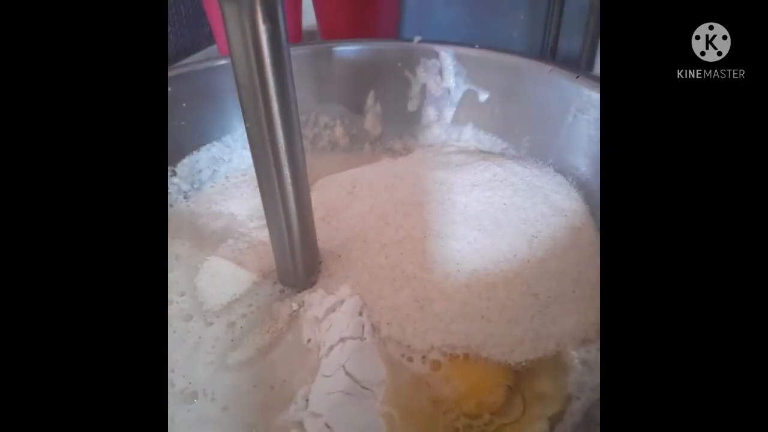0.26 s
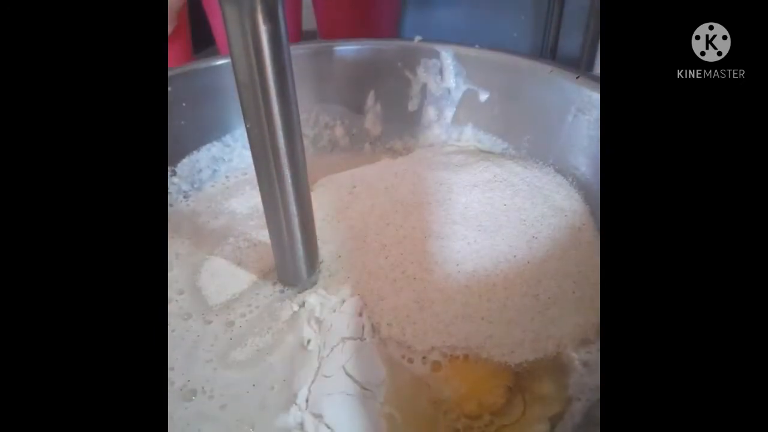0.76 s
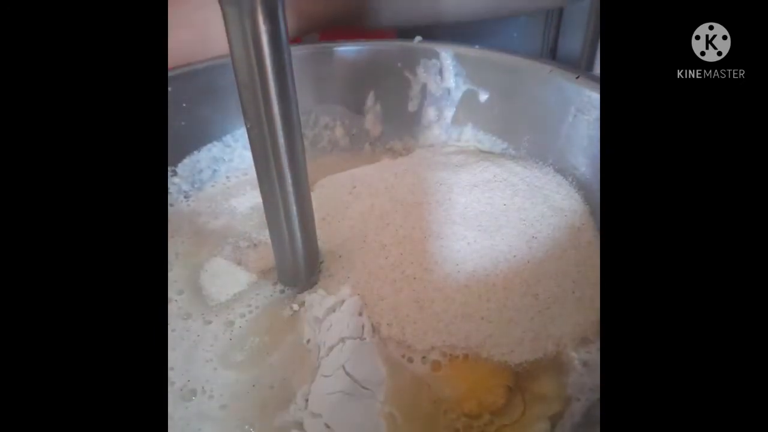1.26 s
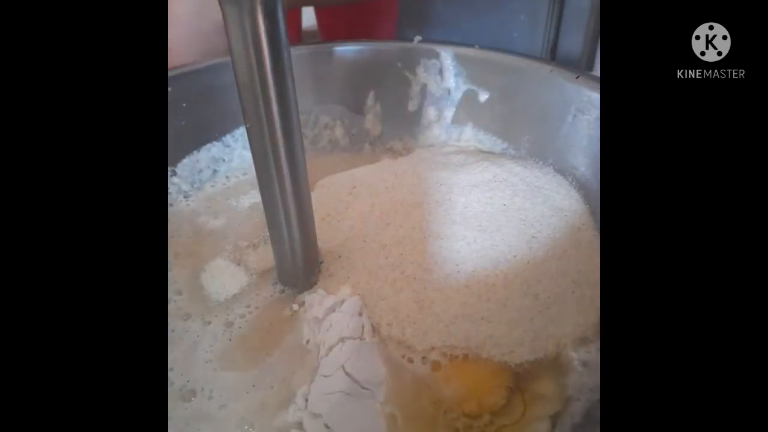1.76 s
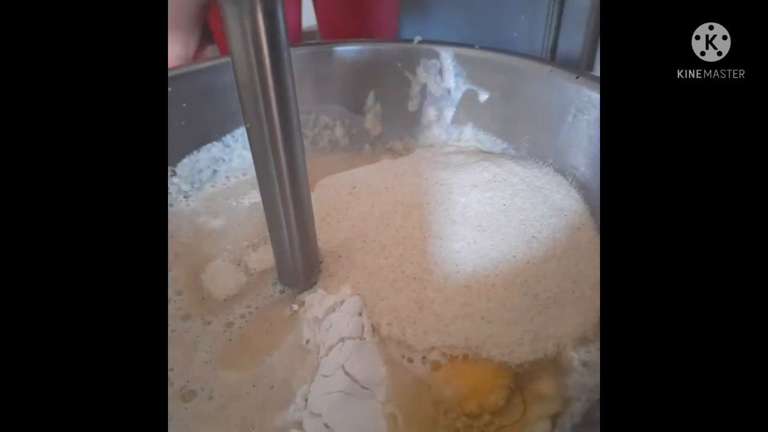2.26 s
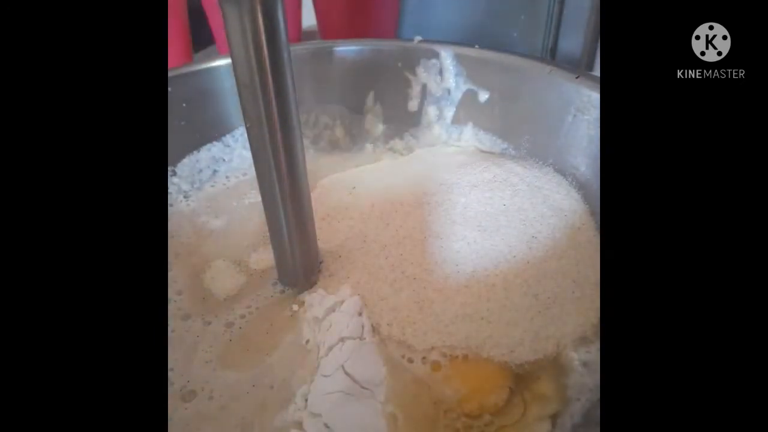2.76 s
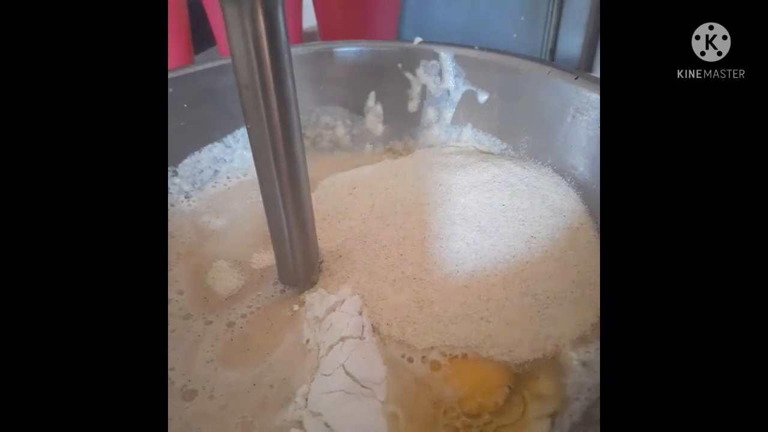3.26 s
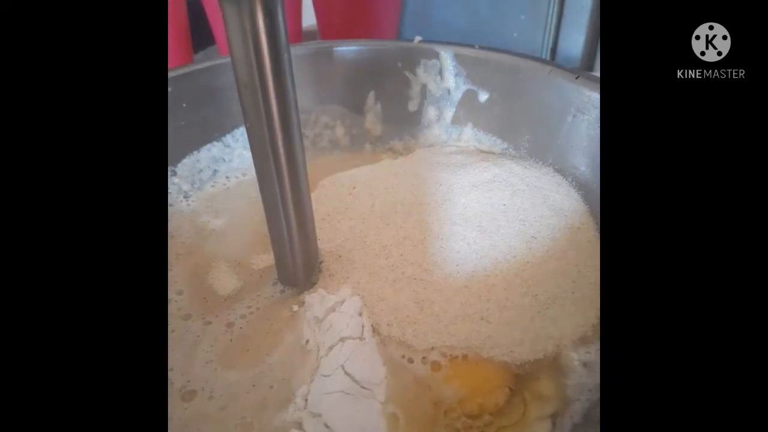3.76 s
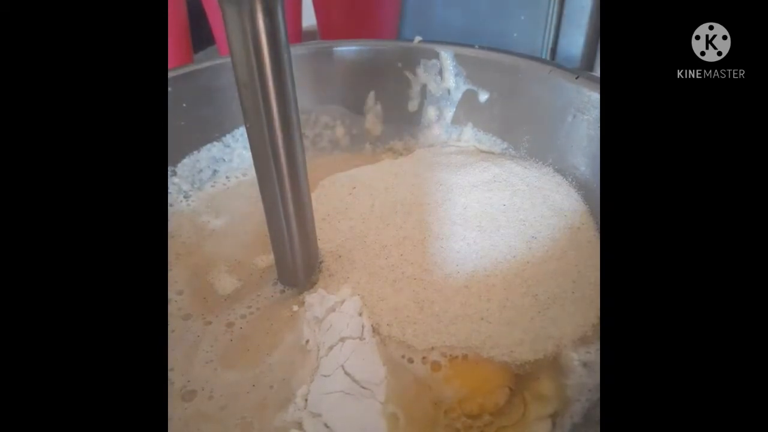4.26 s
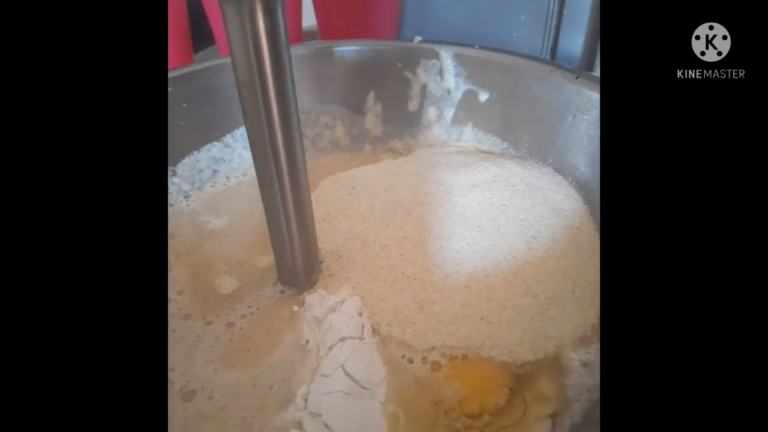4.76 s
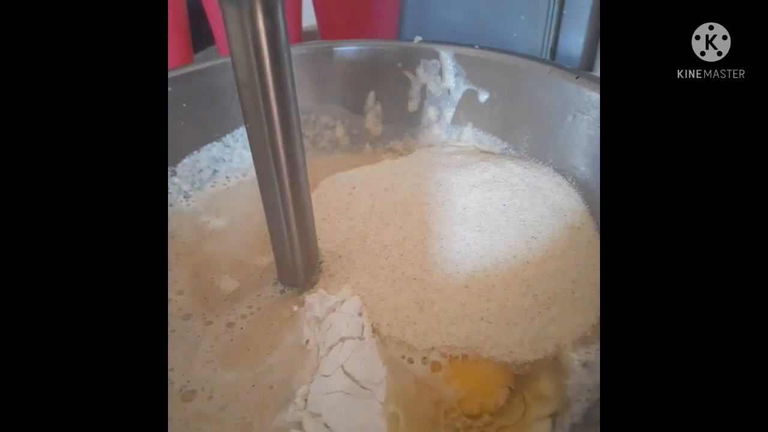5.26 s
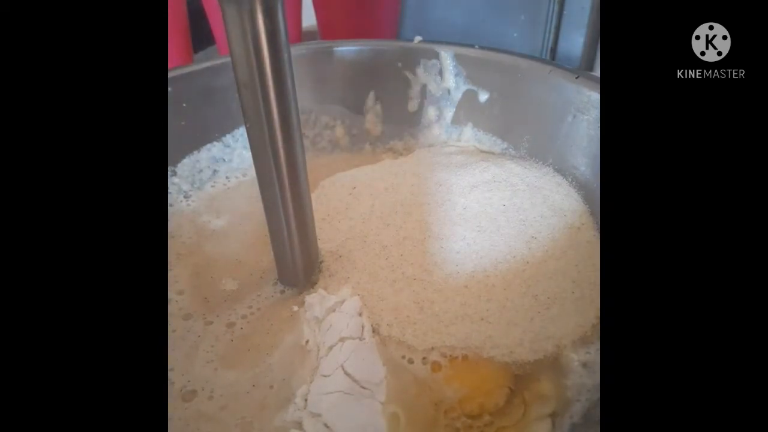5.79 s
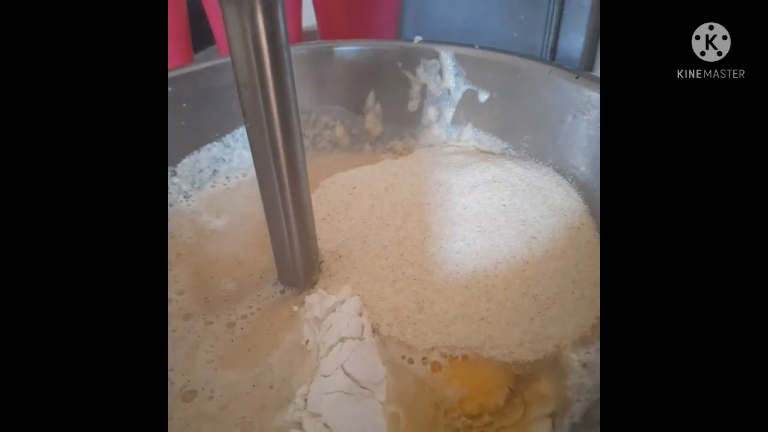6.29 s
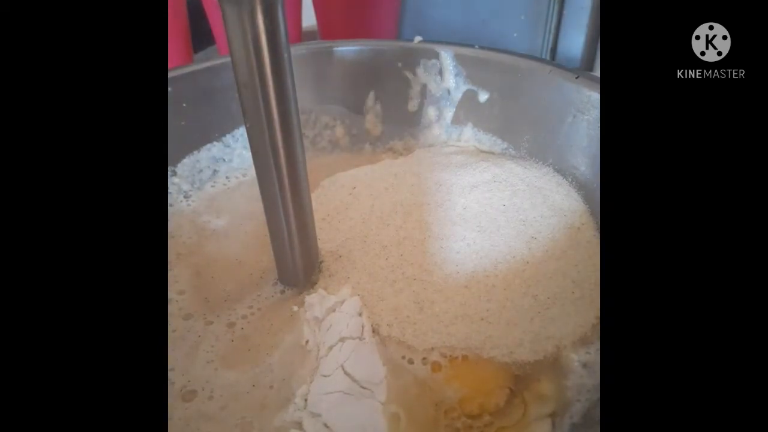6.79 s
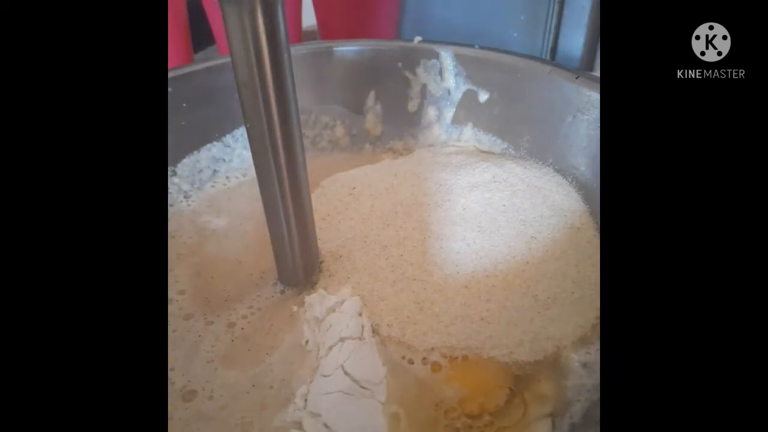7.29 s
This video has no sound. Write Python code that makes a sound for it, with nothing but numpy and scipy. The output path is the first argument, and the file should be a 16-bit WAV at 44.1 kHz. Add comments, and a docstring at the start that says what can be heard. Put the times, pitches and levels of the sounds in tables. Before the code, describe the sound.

In a hushed kitchen, a hollow knock and small counter taps lead into thin paper rustling, then two sharp bursts of tearing and fading crinkles.

```python
"""In a small kitchen, paper sachets are crinkled and torn open twice, over quiet air and a faint hum.
The paper is made of many tiny cracks, larger snaps, dull pops and low puffs, all shaped bursts.
Early on, a blow rings something hollow, and taps and a shove ring a container on the counter.
Echoes and a dying tail of noise make the room. The right microphone port has a strong cavity
resonance that honks on every sound."""
import sys
import numpy as np
from scipy import signal
from scipy.fft import rfft, irfft
from scipy.io import wavfile
from scipy.ndimage import uniform_filter1d

SR = 44100
rng = np.random.default_rng(int(sys.argv[2]) if len(sys.argv) > 2 else 0)


def generate_wav(sig):
    """Save sig (samples, or channels by samples) to the path in sys.argv[1] as 16-bit PCM at SR."""
    pcm = np.round(np.clip(np.atleast_2d(sig).T, -1, 1) * 32767).astype(np.int16)
    wavfile.write(sys.argv[1], SR, pcm)


N = 332411
T = np.arange(N) / SR  # the time of every sample, in seconds

# fingers squeezing and shifting the sachet: (firm at [s], held for [s], relative level [dB],
# body against that level [dB], fizz against that level [dB]); body and fizz get a shared offset later
SQUEEZES = [(0.002, 0.0083, -62.5, 8, 0), (1.295, .02, -65.5, 6, -10), (1.345, 0.071, -61.5, -5, -8),
            (1.52, 0.049, -59, 6.5, -9.5), (1.97, 0.083, -52, -4.5, -9), (2.164, 0.031, -57.5, -2, 0),
            (2.24, 0.038, -49, -3, -5.5), (2.32, 0.064, -60.5, 2, -3), (2.87, 0.06, -71, 0, -3),
            (2.933, 0.16, -60.5, 4.5, -11.5), (3.085, 0.048, -49.5, 1, -6), (3.211, 0.22, -51, -0.5, -10),
            (3.445, 0.062, -52, -4.5, -3), (3.549, 0.034, -50.5, -2.5, -8), (3.711, 0.12, -47, -2.5, -7.5),
            (3.842, 0.24, -56, 0, -6), (4.099, 0.059, -48, -1, -9), (4.214, 0.068, -47, -4, -2.5),
            (5.032, 0.11, -41.5, -1.5, -6.5), (5.2, 0.097, -62.5, -17, -4), (5.38, 0.16, -67.5, 1.5, -10),
            (5.578, .035, -46.5, -14, -9), (5.62, .14, -46, -1.5, -4), (6.3, 0.11, -45, -6, -4),
            (6.443, 0.022, -49.5, 5.5, -12), (6.595, 0.057, -43.5, -3.5, -7.5), (6.67, 0.16, -51, 6, -7),
            (6.861, 0.15, -48, -2, -10.5), (6.958, 0.044, -45.5, -6, -7), (7.049, 0.091, -54, -4, -9),
            (7.163, 0.067, -53, -0.5, -7.5), (7.36, .07, -60.5, -10, -7.5)]
SQUEEZE_RISE_DB_PER_S, SQUEEZE_SAG_DB_PER_S, SQUEEZE_RELEASE_DB_PER_S = 1000, 28.5, 221
# pulls that rip the paper, two for the first tear and three for the second: (ripping at [s],
# held for [s], relative level [dB], body against that level [dB], fizz against that level [dB])
TEARS = [(4.4, 0.19, -29.5, -5, -5.5), (4.69, 0.2, -37, -2.5, -7.5), (5.867, 0.08, -22, -6, -4),
         (6.042, 0.125, -34, -2, -6), (6.183, 0.072, -32.5, -2.5, -7)]
TEAR_RISE_DB_PER_S, TEAR_SAG_DB_PER_S, TEAR_RELEASE_DB_PER_S = 520, 13.5, 254
# large creases snapping: (time [s], relative level [dB], relative fizz [dB])
SNAPS = [(1.341, -34, -13.5), (1.509, -41.5, -11), (1.95, -36.5, -10), (1.996, -33, -16), (2.0737, -45, -7),
         (2.2023, -36, -8), (2.2399, -30, -12), (2.2897, -40, -20), (2.32, -30.5, -9.5), (3.1144, -38, -12),
         (3.1428, -32.5, -24), (3.2081, -38, -4.5), (3.3977, -37.5, -30), (3.4212, -30.5, -12),
         (3.5427, -27, -9), (3.5874, -43.5, 5.5), (3.672, -26.5, -9.5), (3.738, -30, -15),
         (3.7913, -30, -12), (4.0872, -30.5, -13.5), (4.14, -28, -10.5), (4.2138, -23.5, -9),
         (4.2303, -24, -24), (4.3656, -34, -26), (4.384, -22, -13), (4.4298, -9.5, -16.5),
         (4.5076, -7, -6.5), (4.5746, -12.5, -17.5), (4.6613, -22.5, -1.5), (4.679, -12, -13.5),
         (4.723, -18.5, -29), (4.7724, -15, -9.5), (4.8125, -20.5, -5.5), (4.8709, -14.5, -13),
         (4.9774, -27.5, -13), (4.9851, -27, -21.5), (5.0146, -27.5, -6.5), (5.0335, -14.5, -20),
         (5.0724, -21, -12.5), (5.1013, -19, -16.5), (5.1353, -20.5, -10), (5.1971, -32, -8.5),
         (5.482, -46.5, -3), (5.5538, -28.5, -10.5), (5.6167, -29.5, -24), (5.7115, -23.5, -13),
         (5.8336, -20, -16), (5.8846, -18.5, -12), (5.9155, -8.5, -16), (6.0632, -21.5, -7),
         (6.1739, -14, -14), (6.1893, -14.5, -5.5), (6.213, -12, -7), (6.2589, -11.5, -9.5),
         (6.325, -25.5, -12), (6.4453, -26, -7.5), (6.575, -22, -12.5), (6.6023, -21.5, -20),
         (6.6343, -26.5, -15), (6.7262, -31, -15), (6.789, -33.5, -10), (6.8808, -36, -35),
         (6.9873, -19.5, -8.5), (7.0509, -32, -11), (7.1587, -28.5, -16.5), (7.223, -33.5, -18),
         (7.351, -37, -24), (7.418, -40.5, -31)]
# the sachet's wall buckling with a dull pop: (time [s], level [dB], pitch [Hz])
POPS = [(0.0, -52, 870), (0.026, -52.5, 800), (0.468, -60.5, 774), (2.209, -52.5, 570), (2.532, -55.5, 910),
        (3.328, -40, 496), (4.5948, -17.5, 674), (4.7245, -34, 700), (5.033, -31, 1000), (6.0645, -31, 800),
        (6.4415, -32, 586), (6.798, -48, 497)]
# tugs that flap the whole sachet: (time [s], level [dB])
FLAPS = [(2.922, -59), (3.329, -58), (3.39, -60), (4.43, -37.5), (4.5, -31), (4.568, -36), (4.672, -35.5),
         (4.78, -38.5), (5.027, -51), (5.918, -29.5), (6.249, -35.5)]
# tone colour of the paper: (frequency [Hz], relative level [dB])
PAPER = [(25, -14), (55, -25.5), (110, -6), (170, -14), (300, -3), (420, -2.5), (700, -0.5), (1400, 2.5),
         (1900, 5.5), (2700, 0.5), (4200, 2), (8000, -11), (11500, -10), (15500, -11.5)]
# the hollow knock: (time [s], level [dB])
KNOCK = (0.7648, -20.5)
# ringing tones of the hollow body: (frequency [Hz], relative level [dB], time to fall by 60 dB [s])
HOLLOW = [(310, -14, 0.076), (389, -8.5, 0.082), (650, -12.5, 0.11), (860, -14.5, 0.24), (800, 2, 0.036),
          (936, -2.5, 0.056), (1260, -3, 0.02), (1436, -13.5, 0.039), (2093, -11.5, 0.018),
          (2806, -32.5, .012)]
# taps on the container: (time [s], level [dB], dull thud against the tap [dB])
TAPS = [(1.279, -63, 0.5), (1.3405, -34.5, -49), (1.434, -51.5, -31), (1.5245, -42.5, -3),
        (1.6009, -41.5, -30), (1.6395, -36, -37), (2.1515, -35.5, -38)]
# one shove slides the container: (fastest moment [s], level [dB])
SLIDE = (1.772, -39)
SLIDE_RISE_DB_PER_S, SLIDE_FALL_DB_PER_S = 528, 375
# ringing tones of the container: (frequency [Hz], relative level [dB], time to fall by 60 dB [s])
CONTAINER = [(290, -12, 0.076), (739, -18, 0.14), (1090, -27, 0.056), (1300, -2, 0.015),
             (1876, 16.5, 0.012), (2110, 13, 0.022), (3550, 7.5, 0.017), (5170, -5, 0.016),
             (5860, -32, 0.01), (7300, -27, .018), (9200, -10, 0.014), (12200, -10, .014),
             (13700, -15, 0.011)]
# how fast the kitchen's ring dies: (frequency [Hz], time to fall by 60 dB [s])
KITCHEN = [(100, 0.047), (400, 0.5), (900, 0.38), (2200, 0.44), (5000, 0.38), (15000, 0.31)]
# first reflections in the kitchen: (delay [s], relative gain [factor])
WALLS = [(.0068, 0.18), (.0135, 0.18), (.0285, 0.12), (.0345, .18), (.0745, 0.089)]
# tone colour of the still kitchen's air: (frequency [Hz], relative level [dB])
STILL = [(20, -5), (100, -5.5), (220, -9.5), (350, -2.5), (450, -11), (600, -3.5), (1000, -12),
         (2000, -15.5), (5000, -18), (8000, -27), (12000, -21), (16000, -35)]
# steady tones of the appliance hum: (frequency [Hz], level [dB])
HUM = [(339, -93), (786, -99)]
# boosts and notches of the right microphone port: (frequency [Hz], width [Hz], boost or cut [dB])
PORT = [(410, 393, 5), (781, 50, 26.5), (1540, 524, -11), (2296, 425, 13.5), (4770, 990, 1.5),
        (11500, 2500, 5)]
EDGE_HZ = 15900  # treble above this is cut away


def paper(lag=0.00038, half_turns_per_s=1.121, count=3):
    """The sachet is near and to the left; as the hands move it, the echoes of the room shift."""
    left, right = crinkle() + snaps() + pops() + flaps()
    late_right = np.pad(right, (round(lag * SR), 0))[:N]  # the sound reaches the right side later
    near = np.array([left, late_right])
    out = near + walls(near, db=-15.5)
    # separate room tails take turns, so the ring keeps changing
    for k in range(count):
        share = np.cos(np.pi * (half_turns_per_s * T + k / count)) * np.sqrt(2 / count)
        out = out + tail(near * share, db=-7.5)
    return out


def crinkle(per_s=420, crowding=.35, spread_db=3.5, gain_db=3.5, body_db=3.5, fizz_db=9.5, count=24):
    """Tiny cracks of very uneven size: crowded under the lightest touch, sparser at moderate handling, and more
    crowded again as the hands work harder."""
    level, body, fizz = handling()
    rate = per_s * amp(crowding * (level + 46.0))
    rate += 900 * np.clip(-(level + 54.5) / 10, 0, 1)  # the lightest touch only brushes, finely and evenly
    happens = rng.random(N) < rate / SR
    clicks = happens * amp(spread_db * np.minimum(rng.exponential(1, N), 4))
    # even out the crowding, so that the hands alone set the loudness
    local_power = abs(uniform_filter1d(clicks ** 2, size=2000))
    clicks *= amp(level + gain_db) / np.sqrt(local_power + 1e-6)
    # every click gets one of a few ready-made crack shapes
    which = rng.integers(0, count, N)
    cracks = np.zeros((2, N))
    for k in range(count):
        shape = crack(decay=0.0021, scatter=0.16, facet=2.5)
        chosen = (clicks * (which == k))[None]
        cracks += signal.oaconvolve(chosen, shape, axes=1)[:, :N]
    low, middle, high = sheet(colour(cracks, PAPER))
    return amp(body + body_db) * low + middle + amp(fizz + fizz_db) * high


def handling(size=64):
    """Level, body and fizz of the paper in dB; stronger movements count more in the tone colour."""
    t = T[::size]
    squeezes = strokes(t, SQUEEZES, SQUEEZE_RISE_DB_PER_S, SQUEEZE_SAG_DB_PER_S, SQUEEZE_RELEASE_DB_PER_S)
    tears = strokes(t, TEARS, TEAR_RISE_DB_PER_S, TEAR_SAG_DB_PER_S, TEAR_RELEASE_DB_PER_S)
    power = np.vstack([squeezes, tears]) ** 2
    total = power.sum(0) + 1e-14
    body, fizz = np.vstack([SQUEEZES, TEARS]).T[-2:] @ power / total
    level = 10 * np.log10(total)
    return [np.interp(T, t, db) for db in (level, body, fizz)]


def strokes(t, rows, rise, sag, release):
    """Gain of each hand movement: it builds up, sags while held and dies away faster when let go."""
    firm, held, db = np.transpose(rows)[:3, :, None]
    before, since, after = np.maximum([firm - t, t - firm, t - firm - held], 0)
    return amp(db - rise * before - sag * since - release * after)


def crack(decay, scatter, facet, scatter_decay=0.017, size=2048):
    """One crease letting go: a sharp burst, its scatter in the sheet, and the ring of one paper facet."""
    t = T[:size]
    burst = diffuse(np.exp(-t / decay) + scatter * np.exp(-t / scatter_decay))
    facet_hz = np.exp(rng.uniform(np.log(1900), np.log(13000)))
    burst = burst + facet * signal.lfilter(*signal.iirpeak(facet_hz, 5, SR), burst)
    return burst / np.linalg.norm(burst)


def sheet(x, body_hz=1150, fizz_hz=6000):
    """Splits paper sound into the body of the flexing sheet, the crackle of creases and the fizz of fibres."""
    body = band(x, body_hz, "low")
    crackle = band(x, [body_hz, fizz_hz], "band")
    fizz = band(x, fizz_hz, "high")
    return body, crackle, fizz


def snaps(gain_db=14.0, body_db=-14.5, fizz_db=6.5, lead=.0045, lead_db=-16.0):
    """The large creases: each yields a little just before it snaps, and has its own share of fizz."""
    out = np.zeros((2, N))
    for s, db, fizz in SNAPS:
        for at, step_db in ((s - lead, db + lead_db), (s, db)):
            parts = sheet(colour(crack(decay=0.0017, scatter=0.41, facet=1.66), PAPER))
            for part, share_db in zip(parts, (body_db, 0, fizz + fizz_db)):
                gain = amp(step_db + gain_db + share_db)
                add(out, at, gain * part / np.linalg.norm(part))
    return out


def pops():
    """The sachet's wall buckles between the fingers, each time with one short, dull push of air."""
    out = np.zeros((2, N))
    for s, db, hz in POPS:
        add(out, s, amp(db) * pop(hz, cycles=0.45))
    return out


def pop(hz, cycles, size=6000):
    """A dull push that swells and dies within a few cycles."""
    turns = hz * T[:size]
    return peaked(turns * np.exp(-turns / cycles) * np.sin(2 * np.pi * turns))


def flaps(rise=0.016, top_hz=330, boom_hz=109, boom=0.27, size=8000):
    """Each tug flaps the whole sachet: a soft low puff that wakes a room mode."""
    out, t = np.zeros((2, N)), T[:size] / rise
    for s, db in FLAPS:
        puff = diffuse(t * np.exp(-t))
        puff = band(band(puff, top_hz, "low", order=2), 68, "high", order=3)
        puff = puff + boom * signal.lfilter(*signal.iirpeak(boom_hz, 9, SR), puff)
        add(out, s, amp(db) * peaked(puff))
    return out


def knock(soft_hz=1500, tick_db=-21, tick_decay=0.0038, tick_hz=4200, thump_db=-38):
    """A soft blow rings the hollow body, with a faint tick of contact and a low thump."""
    out = np.zeros((2, N))
    softened = band(ring(HOLLOW), soft_hz, "low", order=2)
    body = peaked(band(softened, 810, "high", order=2))
    tick = band(diffuse(np.exp(-T[:len(body)] / tick_decay)), tick_hz, "low")
    thump = peaked(band(tick, 130, "low", order=2))
    s, db = KNOCK
    add(out, s, amp(db) * (body + amp(tick_db) * tick + amp(thump_db) * thump))
    return out


def container(slips_per_s=3000, thud_hz=720):
    """Taps and a short run of slips along the counter ring the same container."""
    out, body = np.zeros((2, N)), peaked(ring(CONTAINER))
    for s, db, thud_db in TAPS:
        contact = diffuse(np.exp(-T[:len(body)] / 0.0055))
        tap = peaked(convolve(contact, body))
        thud = amp(thud_db) * pop(thud_hz, cycles=0.72)
        add(out, s, amp(db) * (tap + thud))
    slips = unit(diffuse(rng.random(N) < slips_per_s / SR))
    # the slide speeds up until its fastest moment, then slows down
    fastest, slide_db = SLIDE
    late = T - fastest
    push = amp(slide_db + np.minimum(SLIDE_RISE_DB_PER_S * late, -SLIDE_FALL_DB_PER_S * late))
    slide = convolve(slips * push, body / np.linalg.norm(body))
    return band(out + slide, 250, "high", order=2)


def walls(x, db):
    """A few hard reflections from the counter, cupboards and walls: delayed, weaker copies."""
    echoes = [gain * np.pad(x, ((0, 0), (round(delay * SR), 0)))[:, :N] for delay, gain in WALLS]
    return amp(db) * sum(echoes)


def tail(x, db, build=0.0005, size=32768):
    """The diffuse ring of the kitchen: noise in which each band dies at its own speed."""
    hz, t, z = signal.stft(diffuse(1 - np.exp(-T[:size] / build)), SR, nperseg=256)
    dying = z * amp(-60 * t / read(KITCHEN, hz)[:, None])
    response = signal.istft(dying, SR, nperseg=256)[1][:, :size]
    return amp(db) * convolve(x, response / np.linalg.norm(response[0]))


def still(air_db=-78, waver=0.34, drone_db=-86, drone_hz=(330, 470), swell_db=19.0):
    """Quiet air and slightly wavering hum tones, with a low noisy drone that swells and fades."""
    drift, swell = (unit(band(row, 3, "low", order=2)) for row in rng.standard_normal((2, N)))
    hum = sum(amp(db) * np.sqrt(2) * np.sin(2 * np.pi * hz * T + waver * drift) for hz, db in HUM)
    drone = unit(band(diffuse(amp(swell_db * np.tanh(swell))), drone_hz, "band"))
    air = unit(colour(diffuse(np.ones(N)), STILL))
    return amp(air_db) * air + hum + amp(drone_db) * drone


def amp(db):
    """Decibels to gain."""
    return 10 ** (np.asarray(db) / 20)


def unit(x):
    """Scales to an rms (average strength) of one."""
    return x / np.sqrt(np.mean(x ** 2) + 1e-20)


def peaked(x):
    """Scales to a peak of one."""
    return x / abs(x).max()


def read(points, hz):
    """Reads a table on a log-frequency axis."""
    f, value = np.transpose(points)
    return np.interp(np.log(hz + 1), np.log(f + 1), value)


def add(mix, s, sound):
    """Mixes a sound in at time s, in seconds."""
    part = mix[:, max(round(s * SR), 0):][:, :sound.shape[-1]]
    part += sound[..., :part.shape[1]]


def convolve(x, response):
    """Passes x through a response, keeping its length."""
    return signal.fftconvolve(np.atleast_2d(x), np.atleast_2d(response), axes=1)[:, :x.shape[-1]]


def colour(x, spectrum, size=2048):
    """Gives x a tone colour with a filter that never sounds ahead of its input."""
    log_gain = np.log(amp(read(spectrum, abs(np.fft.fftfreq(size, 1 / SR)))))
    response = np.fft.ifft(np.exp(np.conj(signal.hilbert(log_gain)))).real
    return convolve(x, response)


def band(x, hz, kind, order=3):
    """Butterworth filter: keeps the low, high or middle band."""
    return signal.sosfilt(signal.butter(order, hz, kind, fs=SR, output="sos"), x)


def diffuse(envelope, apart_hz=2400):
    """Shaped noise at two microphones: alike in the bass, unrelated in the treble."""
    size = len(envelope)
    a, b = rfft(rng.standard_normal((2, size)) * envelope, 2 * size)
    same = np.sinc(np.fft.rfftfreq(2 * size, 1 / SR) / apart_hz)
    return irfft(np.array([a, same * a + np.sqrt(1 - same ** 2) * b]))[:, :size]


def ring(modes, size=6000):
    """Response of a struck object: a sum of dying sines."""
    t = np.arange(size) / SR
    return sum(amp(db - 60 * t / t60) * np.sin(2 * np.pi * hz * t) for hz, db, t60 in modes)


def scene():
    """The knock and the container are farther off than the paper, so they carry more of the room."""
    counter, blow = container(), knock()
    counter = counter + walls(counter, db=-2.5) + tail(counter, db=-9.0)
    blow = blow + walls(blow, db=4.0) + tail(blow, db=4.5)
    return paper() + counter + blow + still()


def record(dry):
    """The right port boosts and notches its channel; then both channels lose their top treble."""
    left, right = dry
    for hz, width, db in PORT:
        resonance, poles = signal.iirpeak(hz, hz / width, SR)
        zeros = poles + (amp(abs(db)) - 1) * resonance
        # swapping the two halves of the filter turns a boost into a notch
        right = signal.lfilter(zeros, poles, right) if db > 0 else signal.lfilter(poles, zeros, right)
    low_pass = signal.firwin(255, EDGE_HZ, window=("kaiser", 8), fs=SR)
    return signal.oaconvolve(np.array([left, right]), low_pass[None], "same")


dry = scene()
out = record(dry)
generate_wav(out)
```